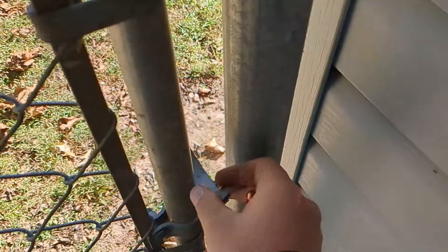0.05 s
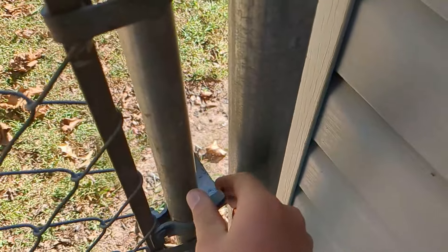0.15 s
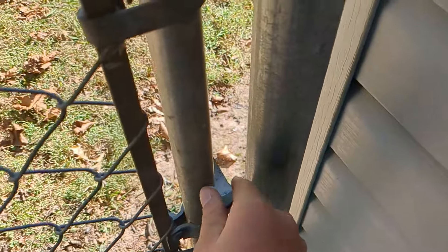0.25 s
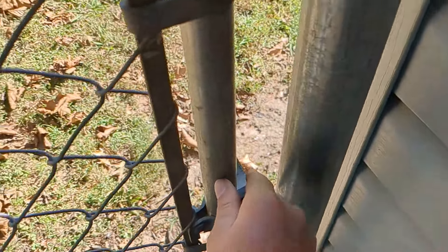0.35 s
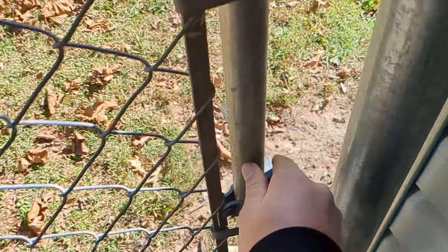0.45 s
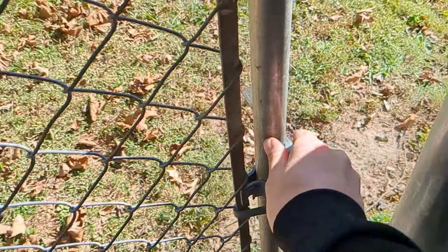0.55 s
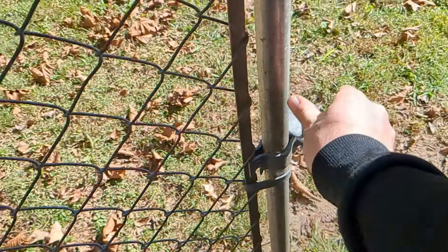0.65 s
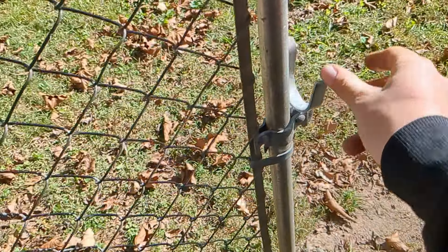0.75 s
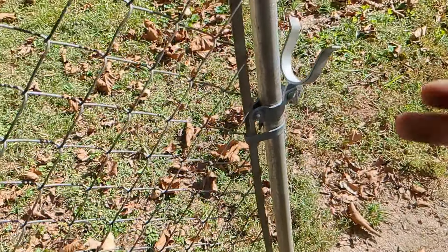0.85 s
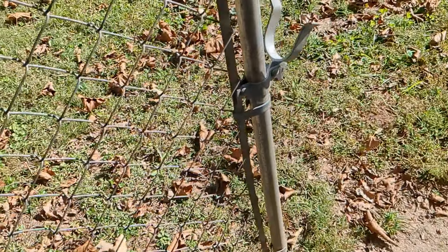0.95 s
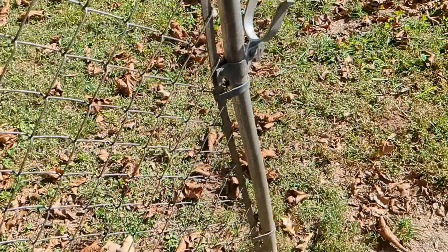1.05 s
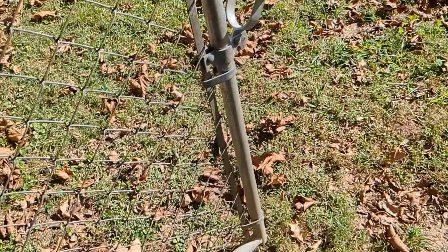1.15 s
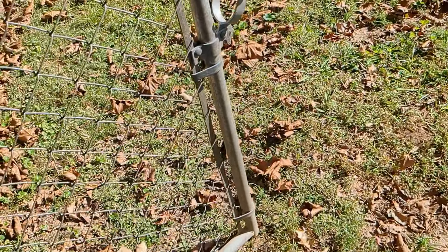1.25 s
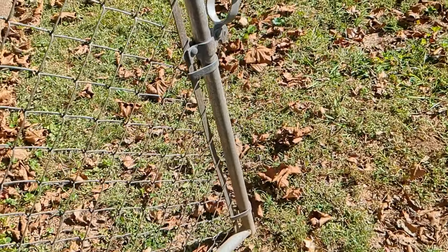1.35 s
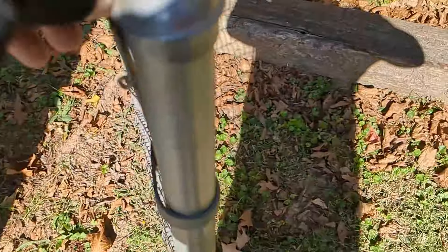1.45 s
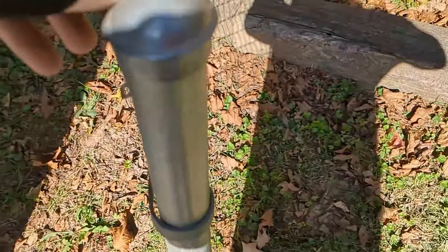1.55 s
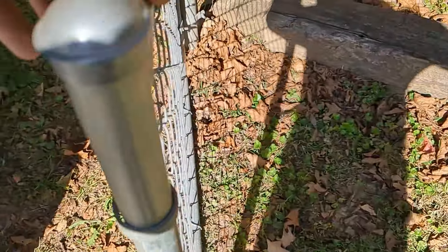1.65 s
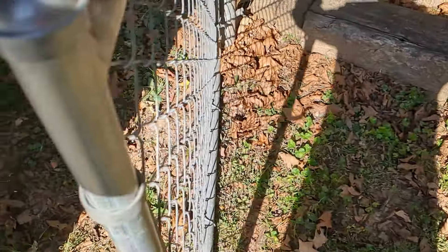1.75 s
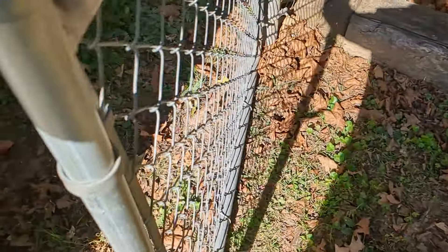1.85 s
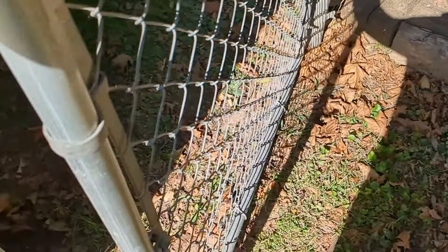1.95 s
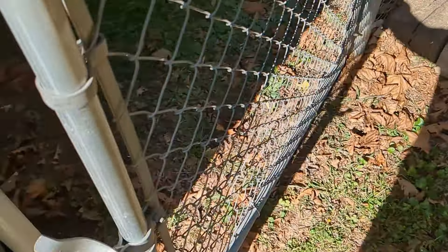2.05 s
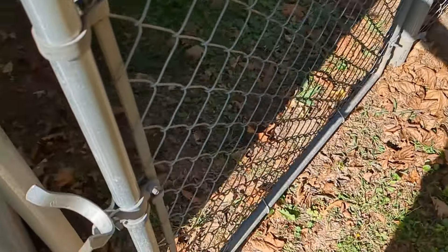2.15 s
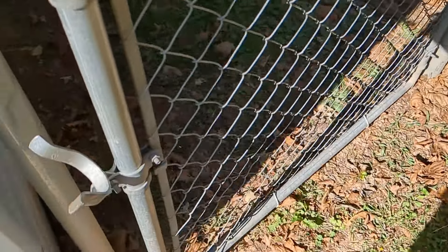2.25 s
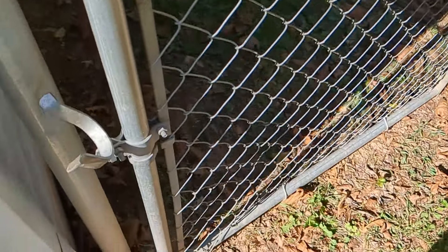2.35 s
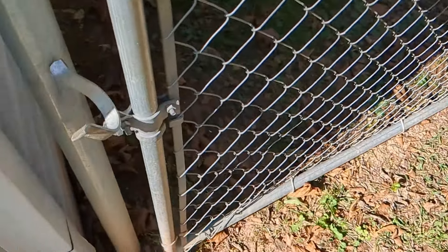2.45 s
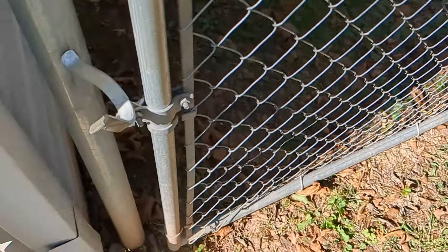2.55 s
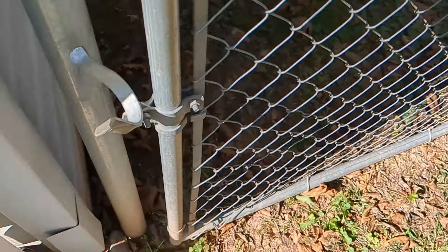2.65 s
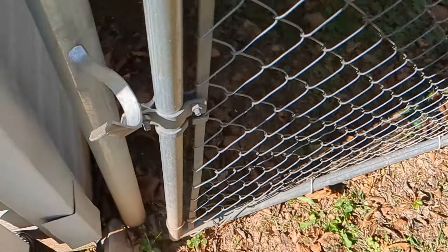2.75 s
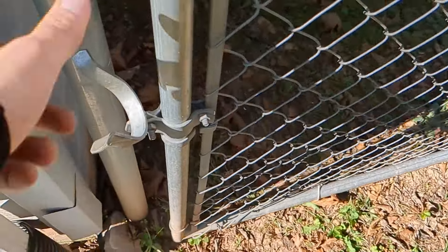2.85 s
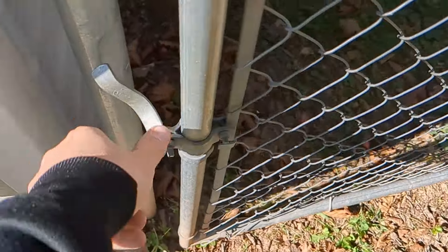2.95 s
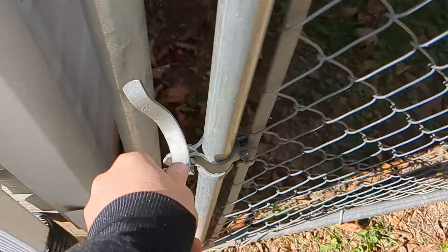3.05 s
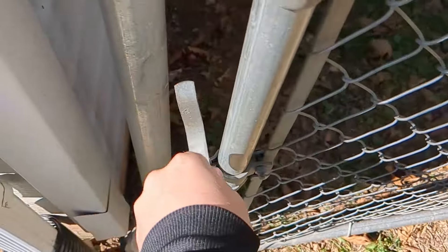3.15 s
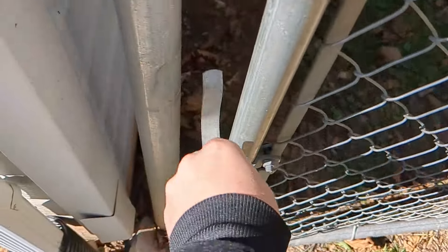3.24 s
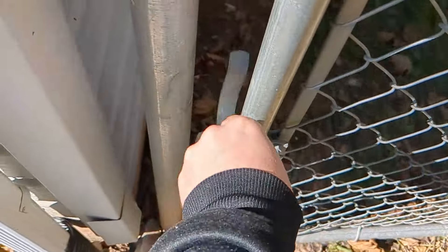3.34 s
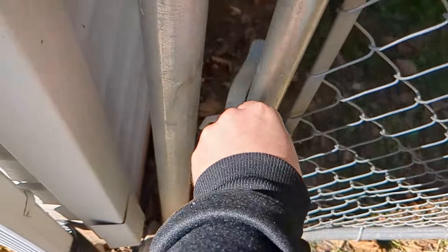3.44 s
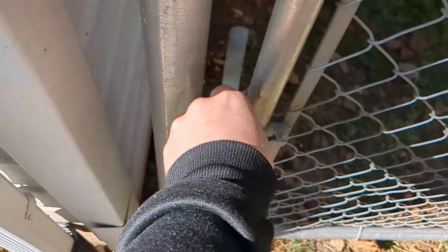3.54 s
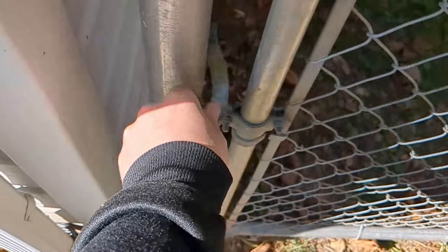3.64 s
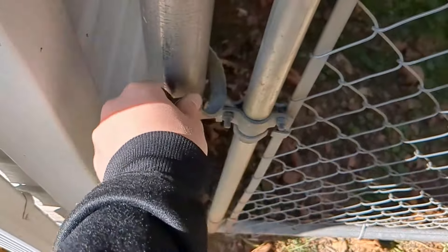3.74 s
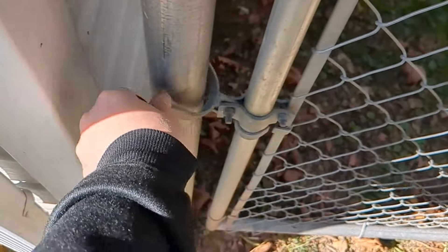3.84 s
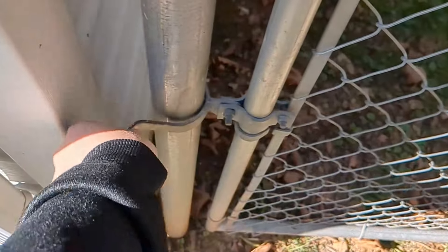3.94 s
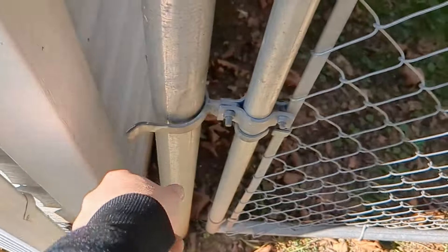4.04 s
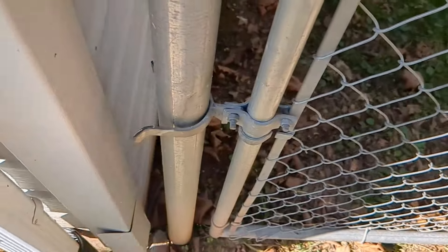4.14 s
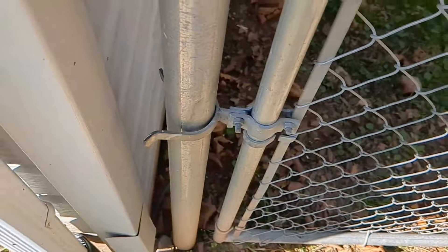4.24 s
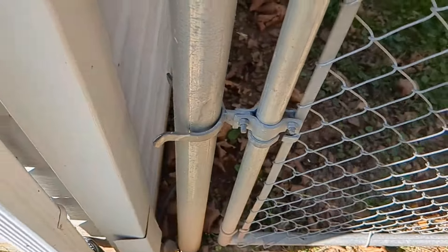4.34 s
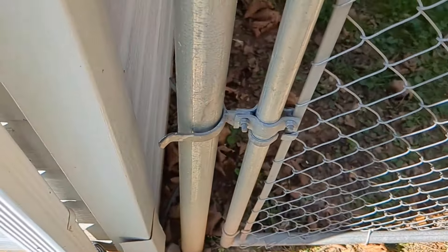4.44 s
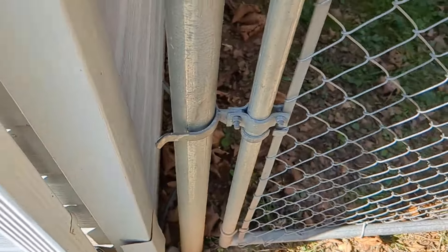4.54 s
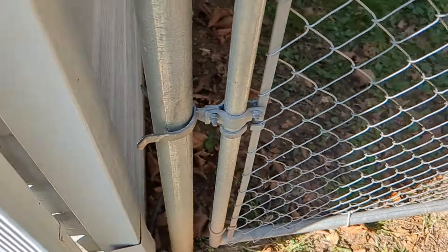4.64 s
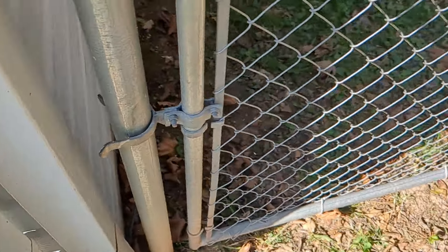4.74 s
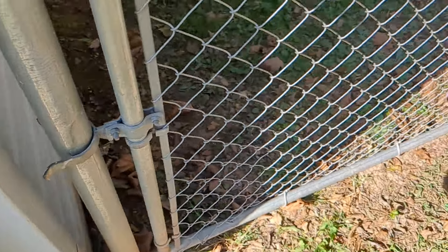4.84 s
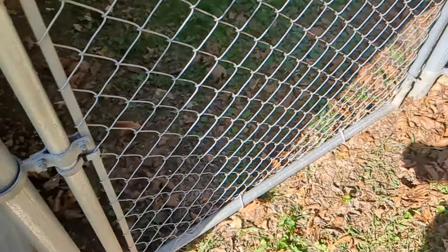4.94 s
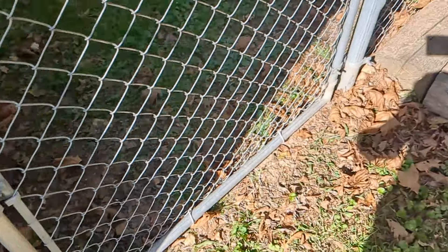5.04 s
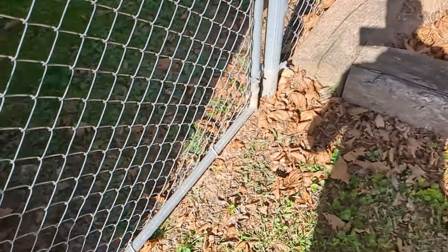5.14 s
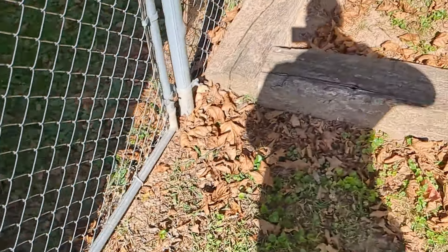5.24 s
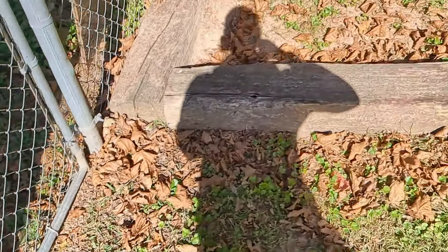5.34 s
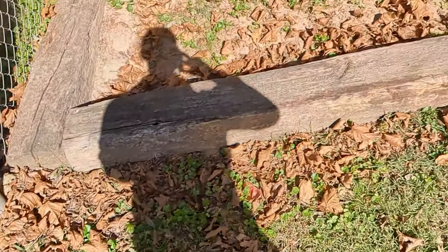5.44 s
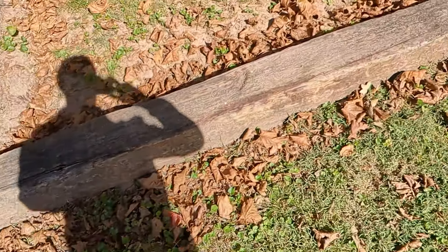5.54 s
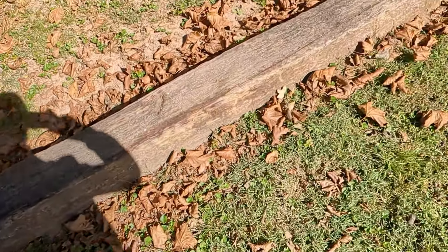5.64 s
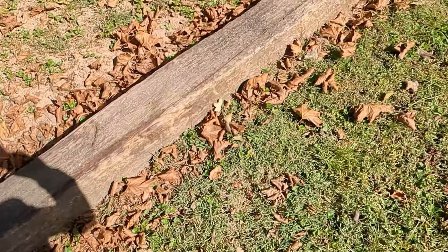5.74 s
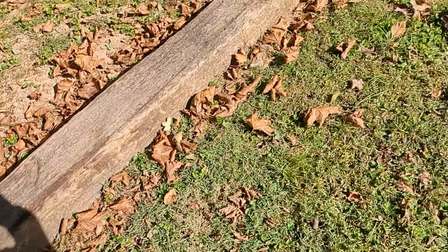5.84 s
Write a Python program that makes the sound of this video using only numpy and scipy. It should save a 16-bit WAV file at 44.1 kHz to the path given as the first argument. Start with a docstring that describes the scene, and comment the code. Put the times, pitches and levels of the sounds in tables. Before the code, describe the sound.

A steel gate latch clanks open, feet crunch through dry leaves with snapping twigs, then the latch rattles, strikes a hollow post and scrapes shut.

```python
"""Yard gate and dry leaves

A chain-link gate is unlatched, swung through dry leaves and latched again, close to the microphone.
The steel fork clanks on the frame, rattles loose, strikes the hollow post and scrapes down it: noise
clashes plus ringing sine tones. Leaves, stems and brushing feet are grains of coloured noise. The hinge
chirps as a gliding tone with overtones, dull knocks are filtered clicks, and a far machine hums in sines."""
import sys
import numpy as np
from scipy import signal
from scipy.fft import rfft, irfft, next_fast_len
from scipy.io import wavfile
from scipy.ndimage import uniform_filter1d, map_coordinates

SR = 44100
rng = np.random.default_rng(int(sys.argv[2]) if len(sys.argv) > 2 else 0)


def transcribe(signal):
    """Save signal, clipped to [-1, 1], as a 16-bit WAV file at the path in sys.argv[1]."""
    frames = np.atleast_2d(signal).T
    limited = np.clip(frames, -1, 1)
    pcm = np.round(limited * 32767).astype(np.int16)
    wavfile.write(sys.argv[1], SR, pcm)


N = 259749
TOP_HZ = 16100  # nothing is kept from here up
TIME = np.arange(N) / SR
TAIL = np.arange(SR) / SR  # one second in which a contact rings out


def amp(db):
    """Decibels to gain."""
    return 10 ** (np.asarray(db) / 20)


def unit(x):
    """x scaled to an rms of 1."""
    return x / np.sqrt(np.mean(x ** 2) + 1e-20)


def along(points, hz):
    """Read (Hz, value) points at any frequency, on a log axis."""
    point_hz, values = np.transpose(points)
    return np.interp(np.log(hz + 1), np.log(point_hz + 1), values)


def wobble(rate):
    """A smooth random curve through rate random points a second."""
    points = rng.standard_normal(int(N * rate / SR) + 4)
    return map_coordinates(points, [TIME * rate])


def coloured(x, spectrum):
    """x filtered by a (Hz, dB) spectrum, then scaled to an rms of 1."""
    n = x.shape[-1]
    m = next_fast_len(n + 4096)
    gain = amp(along(spectrum, np.fft.rfftfreq(m, 1 / SR)))
    return unit(irfft(rfft(x, m) * gain, m)[..., :n])


def noise(n, width):
    """Stereo white noise; width 0 is mono, 1 makes left and right unrelated."""
    mid, side = rng.standard_normal((2, n))
    return unit(np.array([mid + width * side, mid - width * side]))


def panned(lr_db):
    """Left and right gains of constant power; positive dB leans left."""
    gains = amp(np.array([[lr_db], [-lr_db]]) / 2)
    return gains / np.sqrt(np.mean(gains ** 2, axis=0))


def fade(t60):
    """A decay that loses 60 dB in t60 seconds."""
    return np.exp(-np.log(1000) * TAIL / t60)


def add(track, s, sound):
    """Mix a sound into the track at time s, in seconds."""
    start = round(s * SR)
    track[:, start:start + sound.shape[-1]] += sound[..., :N - start]


def gritty(rate, spread_db, life, width):
    """Noise in tiny bursts of uneven size: rate a second, power dying with time constant life, in seconds."""
    starts = rng.random(N) < rate / SR
    sizes = starts * amp(spread_db * np.minimum(rng.exponential(size=N), 4))
    power = signal.lfilter([1], [1, -np.exp(-1 / (life * SR))], sizes ** 2)
    return noise(N, width) * np.sqrt(power)


def rippled(spectrum, ripple_db, spacing_hz):
    """A spectrum broken into the many close, irregular resonances of a real object."""
    hz = np.arange(150, TOP_HZ, 25)
    ripple = map_coordinates(rng.standard_normal(1024), [hz / spacing_hz])
    return np.column_stack([hz, along(spectrum, hz) + ripple_db * ripple])


def patchy(x, depth_db):
    """Every leaf has its own colour: short patches of random gain in time and frequency."""
    z = signal.stft(x, nperseg=256)[2]
    field = rng.standard_normal(z.shape[1:])
    field = uniform_filter1d(field, size=5, axis=0)  # smooth over frequency
    field = uniform_filter1d(field, size=4, axis=1)  # smooth over time
    return unit(signal.istft(z * amp(depth_db * unit(field)), nperseg=256)[1][:, :N])


def strokes(rows, rise_s, decay_s):
    """Gain of (start s, length s, dB) strokes: each rises, holds, then dies by 60 dB in decay_s."""
    power = np.zeros(N)
    for s, length, db in rows:
        rise = np.clip((TIME - s) / rise_s, 0, 1)
        release = np.exp(-np.log(1000) * np.maximum(TIME - s - length, 0) / decay_s)
        power += (amp(db) * rise * release) ** 2
    return np.sqrt(power)


# Tones of the far machine. Each row: frequency in Hz, level in dB relative to HUM_DB.
HUM_TONES = [(80, -5), (119.6, -2), (221, -16), (240, -14)]
# Colour of the distant rumble. Each row: frequency in Hz, relative level in dB per Hz.
RUMBLE_COLOUR = [(20, -35), (40, -17.5), (60, -0.5), (78, 3), (100, -1), (135, -1.5), (190, -20),
                 (245, -26), (310, -26.5), (460, -28), (800, -41.5), (1600, -100)]
# The rumble sinks and swells. Each row: time in seconds, level in dB.
RUMBLE_LEVEL = [(0.0, -64), (0.33, -58.5), (0.95, -60.5), (1.38, -67), (1.55, -57.5), (2.2, -51.5),
                (3.1, -52.5), (3.75, -60), (4.1, -54), (5.89, -55.5)]
# Colour of the faint open-air hiss. Each row: frequency in Hz, relative level in dB per Hz.
HISS_COLOUR = [(60, -16), (160, 22.5), (300, 13.5), (500, 7), (1000, 8.5), (2000, -1), (4000, -15),
               (8000, -60), (16000, -33)]
HUM_DB, HUM_SWAY_DB = -56.5, 2.1  # the sway scales a random curve


def yard():
    """A far machine's steady tones waver in level and phase, over low rumble and faint hiss."""
    hum = 0
    for hz, db in HUM_TONES:
        level = amp(HUM_DB + db + HUM_SWAY_DB * wobble(5))
        phase = 2 * np.pi * hz * TIME + 1.12 * wobble(6)
        hum = hum + level * np.sqrt(2) * np.sin(phase)
    times, levels_db = np.transpose(RUMBLE_LEVEL)
    rumble_gain = amp(np.interp(TIME, times, levels_db))
    rumble = rumble_gain * panned(0.76) * coloured(noise(N, 0.25), RUMBLE_COLOUR)
    hiss = amp(-67.5) * coloured(noise(N, 0.44), HISS_COLOUR)
    return hum + rumble + hiss


# How long the wire mesh shivers. Each row: frequency in Hz, time to die by 60 dB in seconds.
MESH_DECAY = [(300, 0.69), (1200, 0.57), (2500, 0.52), (5000, 0.31), (10000, 0.29), (16000, 0.13)]


def steel(hits, modes, clash, clash_t60, clash_db, mesh_db, lr_db):
    """Each contact gives a short noise clash, rings the part's own tones and makes the wire mesh shiver."""
    out = np.zeros((2, N))
    for s, db, tilt_db, ring_db in hits:
        hardness = [(2500, 0.02), (11000, tilt_db)]  # harder contacts are brighter
        tilted = [(hz, level + along(hardness, hz)) for hz, level in clash]
        colour = rippled(tilted, ripple_db=3, spacing_hz=110)
        blow = coloured(noise(SR, 1.0), colour) * fade(clash_t60)

        # each frequency of the shiver dies at its own speed
        hz, t, z = signal.stft(coloured(noise(SR, 1.0), colour), SR, nperseg=256)
        mesh_fade = np.exp(-np.log(1000) * t / along(MESH_DECAY, hz)[:, None])
        shiver = signal.istft(z * mesh_fade, SR, nperseg=256)[1][:, :SR]

        size = amp(db + max(tilt_db, 0) / 2)
        sound = size * panned(lr_db) * (amp(clash_db) * blow + amp(mesh_db) * shiver)
        for mode_hz, level, t60, side_db in modes:
            phase = rng.uniform(0, 2 * np.pi) + rng.normal(0, 0.7, (2, 1))  # left and right differ a little
            strength = amp(db + ring_db + level + along(hardness, mode_hz) + rng.normal(0, 1))
            sound += strength * panned(side_db) * fade(t60) * np.sin(2 * np.pi * mode_hz * TAIL + phase)
        add(out, s, sound * (1 - fade(0.004)))  # a very short rise
    return out


# Contacts on the gate frame. Each row: start in seconds, basic level in dB, treble tilt in dB,
# ringing in dB relative to the basic level.
FRAME_HITS = [(0.0, -39.5, -11, -6.5), (0.021, -42, -18, -12), (0.067, -44.5, -19, -20),
              (0.1096, -31.5, 1, -3), (0.3375, -44, 9.5, -15), (0.667, -48.5, 4.5, -12),
              (0.8415, -43, 1, -13), (0.866, -44.5, -5.5, 1), (0.894, -39.5, -11, -9),
              (0.916, -36, -7, -19), (1.0415, -40.5, 3, -25), (1.199, -48.5, -6, -31),
              (1.371, -45, 4.5, -35)]
# Ringing tones of the frame. Each row: frequency in Hz, relative level in dB,
# time to die by 60 dB in seconds, left-over-right balance in dB.
FRAME_MODES = [(1682, -14, .33, 10), (1764, 0, .33, 8), (1805, -3, .36, 11), (1868, -2, .3, 11),
               (2131, -8, .42, 9), (2224, -12, .3, 10), (2676, -4.5, .33, 13), (2747, -9, .38, 10),
               (2806, -9, .34, 11), (2868, -9, .34, 11), (2980, -12, .33, 8), (4463, -14, .13, 0),
               (9457, -1, .1, -8)]
# Colour of the frame's clash. Each row: frequency in Hz, relative level in dB per Hz.
FRAME_CLASH = [(150, -22), (400, -19.5), (600, -17.5), (1100, -8), (1750, -2.5), (2300, -1.5), (2950, -0.5),
               (3700, -7), (4900, -13.5), (6400, -9), (8200, -16), (11500, -10), (16000, -22)]


def frame_clanks():
    """The fork clanks on the steel gate frame, which rings in its own tones."""
    return steel(FRAME_HITS, FRAME_MODES, FRAME_CLASH, clash_t60=0.044, clash_db=3.5, mesh_db=-6.5, lr_db=5)


# Feet treading and dragging through leaves. Each row: start in seconds, length in seconds
# before dying away, crackle level in dB, brushing level in dB.
STEPS = [(0.484, 0.23, -65, -62), (0.682, .15, -59, -53), (0.86, 0.17, -49, -49), (1.075, .17, -50.5, -47),
         (1.286, 0.14, -53, -53.5), (1.607, 0.43, -60, -59.5), (2.07, 0.24, -57, -56.5),
         (2.34, 0.26, -52, -54), (2.718, .08, -53, -56.5), (2.955, 0.34, -66, -66),
         (3.366, 0.14, -63.5, -61.5), (4.566, 0.24, -69, -72), (4.797, 0.087, -63.5, -64.5),
         (5.162, .1, -66.5, -67), (5.343, 0.075, -63.5, -64.5), (5.509, 0.27, -67.5, -80.5),
         (5.827, 0.049, -55.5, -60.5)]
# Colour of the leaf crackle. Each row: frequency in Hz, relative level in dB per Hz.
LEAF_COLOUR = [(300, -32), (1500, -14), (3500, -24.5), (6200, -8), (8000, -11), (10000, 1), (12300, 0),
               (14000, -4), (16000, -48)]
# Colour of the brushing. Each row: frequency in Hz, relative level in dB per Hz.
BRUSH_COLOUR = [(150, -26), (400, -9), (750, -2), (1300, 1.5), (2000, 5.5), (3500, -1), (6200, -1.5),
                (8500, -13.5), (16000, -7)]
STEP_RISE_S, STEP_DECAY_S = 0.027, 0.53  # the weight comes on; the leaves settle by 60 dB
SETTLED_DB, SLEEVE_DB = -81.5, -77.5  # crackle and brushing that go on between steps
LEAF_LR_DB = -6  # the leaves lie to the right
TWIG_RATE, TWIG_DB = 55, -7.5  # small stems that break a second; their level against the crackle


def leaves():
    """Each step crackles dry leaves and breaks small stems, over softer brushing of feet and sleeve."""
    steps = np.array(STEPS)
    crush = strokes(steps[:, [0, 1, 2]], STEP_RISE_S, STEP_DECAY_S)
    sweep = strokes(steps[:, [0, 1, 3]], STEP_RISE_S, STEP_DECAY_S)
    crush, sweep = np.hypot(crush, amp(SETTLED_DB)), np.hypot(sweep, amp(SLEEVE_DB))

    crackle = coloured(gritty(rate=1300, spread_db=4.5, life=0.0017, width=0.88), LEAF_COLOUR)
    crackle = patchy(crackle, depth_db=2.5)
    brush = coloured(gritty(rate=1200, spread_db=2.0, life=0.0021, width=1.0), BRUSH_COLOUR)
    brush = patchy(brush, depth_db=3.2)
    stem_colour = [(300, -14), (1500, -0.5), (12000, -0.5), (16000, -5)]
    stems = coloured(gritty(rate=TWIG_RATE, spread_db=4, life=0.00085, width=1.0), stem_colour)
    return crush * panned(LEAF_LR_DB) * (crackle + amp(TWIG_DB) * stems) + sweep * brush


# The loudest twigs snapping. Each row: start in seconds, level in dB before the fades,
# lift of the low crack in dB.
SNAPS = [(1.042, -20.5, -7), (1.131, -16, -14), (1.222, -22.5, -14.5), (1.269, -23, -28),
         (1.4735, -28.5, -25), (2.071, -26, -27), (2.6265, -24, -9), (5.1514, -32.5, -31),
         (5.5895, -31.5, -19), (5.702, -39, -19), (5.8383, -33, -12)]
SNAP_LR_DB = -4.5  # to the right


def snaps():
    """Single stems break with a sharp noise tick and a faint, longer scatter."""
    out = np.zeros((2, N))
    for s, db, low_db in SNAPS:
        colour = [(400, low_db - 32), (1900, low_db + 28.5), (4500, -2), (11000, 11.0), (16000, 7)]
        stem = rippled(colour, ripple_db=3, spacing_hz=470)
        decay = fade(0.0087) + amp(-27.5) * fade(0.11)  # tick, then scatter
        tick = coloured(noise(SR, 0.93), stem) * decay
        add(out, s, amp(db) * panned(SNAP_LR_DB) * tick * (1 - fade(0.0082)))
    return out


# Dull knocks. Each row: start in seconds, low edge in Hz, high edge in Hz, peak level in dB.
KNOCKS = [(1.101, 312, 1480, -34), (1.104, 60, 120.5, -34.5), (2.9242, 338, 1160, -27.5)]


def knocks():
    """Dull, heavily damped bumps close to the microphone: a click through a band filter."""
    out = np.zeros((2, N))
    for s, low_hz, high_hz, db in KNOCKS:
        band = signal.butter(4, [low_hz, high_hz], "band", fs=SR, output="sos")
        bump = signal.sosfilt(band, signal.unit_impulse(SR // 2))
        add(out, s, amp(db) * bump / np.abs(bump).max())
    return out


# The loose fork knocking in its collar. Each row: start in seconds, basic level in dB,
# treble tilt in dB, ringing in dB relative to the basic level.
FORK_HITS = [(1.985, -46.5, -12.5, -11), (2.5205, -33, 0, -6.5), (2.5275, -34, -6, -11),
             (2.5445, -38, -8.5, 3.5), (2.987, -49.5, -14, -0.5), (3.0895, -44, -9.5, -4),
             (3.251, -56, -12, -6), (3.402, -47.5, -10.5, -3), (3.447, -53, -23, 1.5)]
# Ringing tones of the fork. Each row: frequency in Hz, relative level in dB,
# time to die by 60 dB in seconds, left-over-right balance in dB.
FORK_MODES = [(1069, -13, .42, 4), (1317, -14, .3, -4), (1787, -15, .25, 0), (1897, -6, .28, 1),
              (1942, -14, .25, -3), (2261, -15, .29, 0), (2730, -13, .35, 1), (4007, -7, .15, -10),
              (5255, -9, .17, 10), (5496, -7, .15, 1)]
# Colour of the fork's clash. Each row: frequency in Hz, relative level in dB per Hz.
FORK_CLASH = [(150, -19.5), (400, -10), (800, -7.5), (1100, -3), (2000, -1.5), (3000, -1.5), (5400, -1),
              (7500, -4), (10500, 2), (16000, -11.5)]


def fork_rattle():
    """The loose fork knocks in its collar and rings in its own tones."""
    return steel(FORK_HITS, FORK_MODES, FORK_CLASH, clash_t60=0.075, clash_db=4.0, mesh_db=-7.0, lr_db=-2.5)


# Hinge chirps. Each row: start in seconds, length in seconds, start pitch in Hz and end pitch in Hz
# before jitter, level in dB of the lowest tone before panning and roughness.
CHIRPS = [(2.235, 0.029, 2054, 2296, -49.5), (2.255, 0.0293, 2300, 2400, -46),
          (2.809, 0.044, 2250, 2300, -59.5)]


def hinge():
    """Brief rough squeaks of rising, jittery pitch, with a strong octave."""
    out = np.zeros((2, N))
    for s, length, from_hz, to_hz, db in CHIRPS:
        n = int(length * SR)
        pitch = np.linspace(from_hz, to_hz, n) * (1 + 0.1 * wobble(1500)[:n])
        phase = 2 * np.pi * np.cumsum(pitch) / SR
        tone = np.sin(phase) + 1.52 * np.sin(2 * phase) + 0.3 * np.sin(3 * phase)
        grip = amp(3 * wobble(400)[:n])  # rough, uneven loudness
        add(out, s, amp(db) * panned(-12) * grip * tone * signal.windows.tukey(n, 0.5))
    return out


# The fork striking the post. Each row: start in seconds, basic level in dB, treble tilt in dB,
# ringing in dB relative to the basic level.
POST_HITS = [(3.6703, -27.5, 0.5, 3.5), (3.8915, -37.5, -7.5, 5.5), (3.916, -37, 0, -21),
             (3.943, -41.5, 8, -25), (3.964, -38.5, 0, 4), (3.984, -39, -13, 1.5), (3.999, -38.5, -2, 0)]
# Ringing tones of the hollow post, also used by the scrape. Each row: frequency in Hz,
# relative level in dB, time to die by 60 dB in seconds when free, left-over-right balance in dB.
POST_MODES = [(960, -29, .8, 2), (1002, -19, .65, -1), (1070, -23, .6, 0), (1308, -25, .3, 0),
              (1868, -26, .2, 0), (2728, -11.5, .48, 13), (2779, -20, .48, 13), (2925, -16, .2, 0),
              (3360, -19, .13, 0), (5192, -13, .32, -10), (5249, -19, .33, 3), (9986, -13, .07, 7),
              (12350, -24, .15, 0)]
# Colour of the post's clash. Each row: frequency in Hz, relative level in dB per Hz.
POST_CLASH = [(150, -63), (400, -15.5), (750, -15), (1000, 0), (1550, -6), (2900, 4), (4400, -7.5),
              (5400, -2.5), (7300, -12), (10000, -10), (12500, -13.5), (16000, -25)]


def post_strikes():
    """The fork strikes the hollow post, which rings in its own tones."""
    return steel(POST_HITS, POST_MODES, POST_CLASH, clash_t60=0.091, clash_db=0.5, mesh_db=-14.5, lr_db=-3.0)


# The fork slides down the post in two pushes. Each row: start in seconds, length in seconds
# before dying away, drive level in dB.
PUSHES = [(3.75, 0.021, -51.5), (3.875, 0.12, -47.5)]
# Colour of the rasp. Each row: frequency in Hz, relative level in dB per Hz.
SCRAPE_COLOUR = [(150, -58), (250, -58), (414, -6.5), (510, -21), (802, -2.5), (890, -16), (1040, -1.5),
                 (1530, -7.5), (2530, -11), (2760, -26), (4190, -14.5), (12800, -25), (15200, -33),
                 (16000, -38)]
PUSH_RISE_S, PUSH_DECAY_S = 0.027, 0.32  # time to take hold; time to die by 60 dB


def scrape():
    """The fork sticks and slips down the galvanised post: a noise rasp, and the post singing along."""
    grains = gritty(rate=640, spread_db=2.0, life=0.0025, width=0.74)
    slips = strokes(PUSHES, PUSH_RISE_S, PUSH_DECAY_S) * grains
    level = np.sqrt(np.mean(slips ** 2))
    rasp = coloured(slips, rippled(SCRAPE_COLOUR, ripple_db=2.5, spacing_hz=100))
    ring = 0
    for hz, db, t60, _ in POST_MODES:
        damped = fade(t60 * 0.22)  # the contact shortens the ringing
        ring = ring + amp(db) * damped * np.sin(2 * np.pi * hz * TAIL)
    song = unit(signal.fftconvolve(slips, ring[None], axes=1)[:, :N])
    return level * (amp(-2.1) * rasp + amp(-8.0) * song)


def scene():
    """Gate, leaves and yard together."""
    gate = frame_clanks() + fork_rattle() + hinge() + post_strikes() + scrape()
    ground = leaves() + snaps()
    return yard() + gate + ground + knocks()


def record(dry):
    """Remove everything from TOP_HZ up."""
    m = next_fast_len(N + SR // 2)
    keep = np.fft.rfftfreq(m, 1 / SR) < TOP_HZ
    return irfft(rfft(dry, m) * keep, m)[:, :N]


dry = scene()
out = record(dry)
transcribe(out)
```